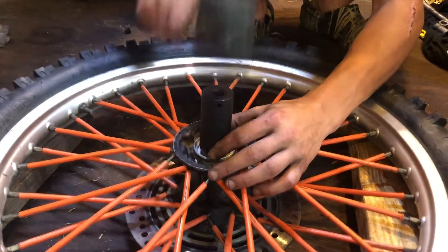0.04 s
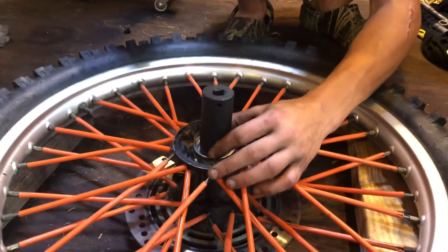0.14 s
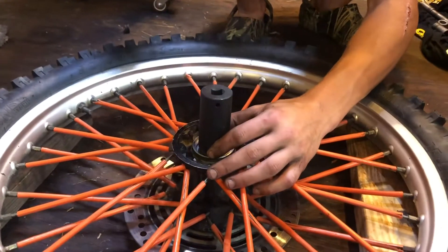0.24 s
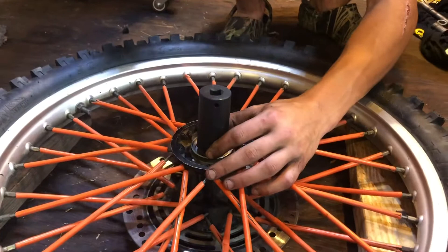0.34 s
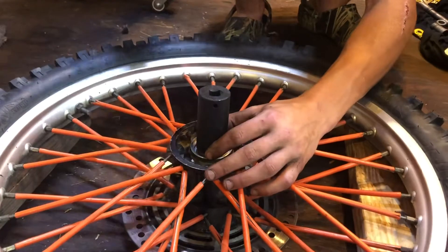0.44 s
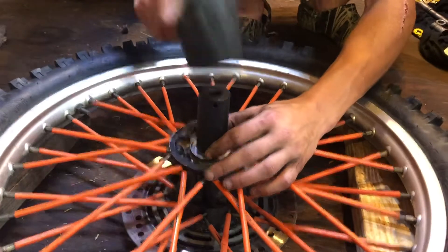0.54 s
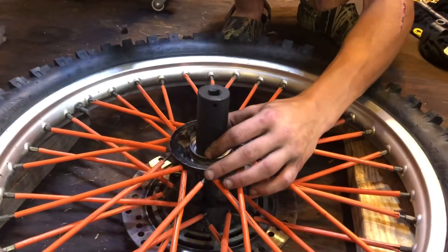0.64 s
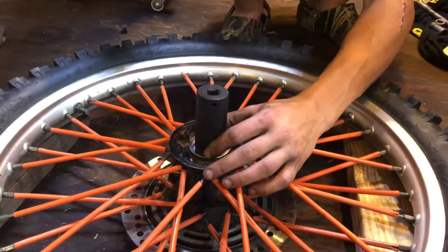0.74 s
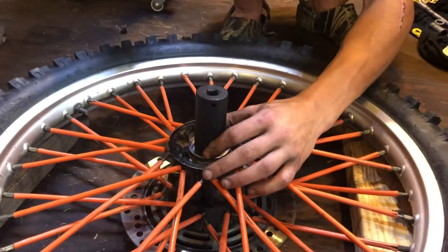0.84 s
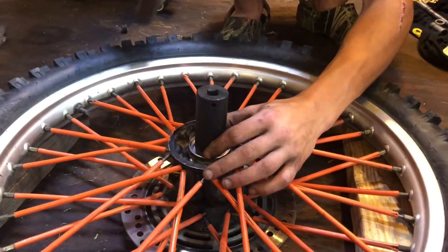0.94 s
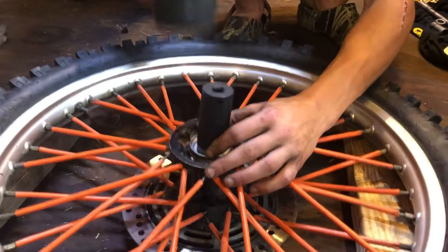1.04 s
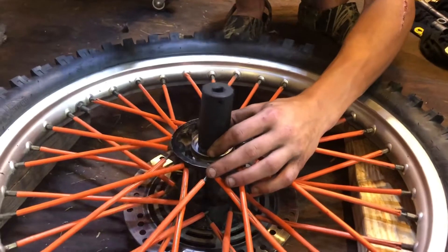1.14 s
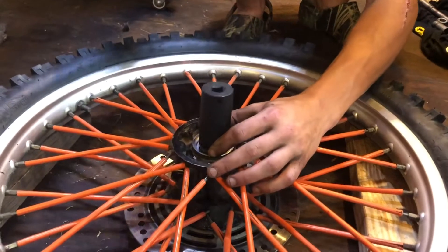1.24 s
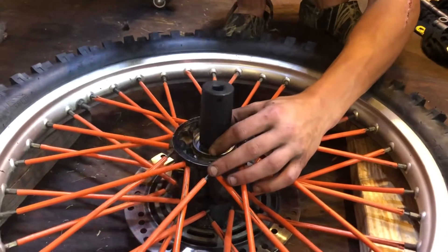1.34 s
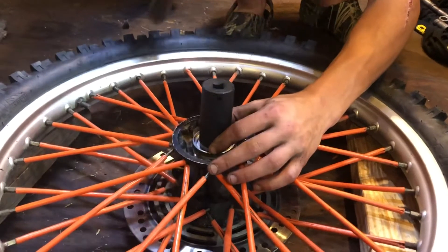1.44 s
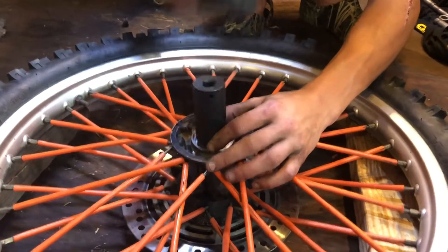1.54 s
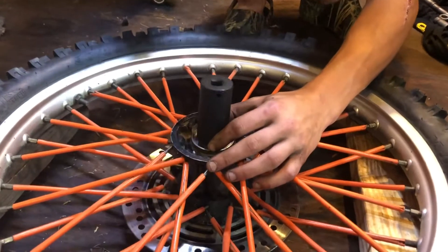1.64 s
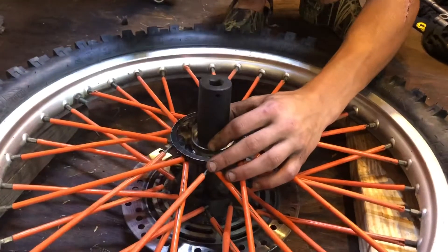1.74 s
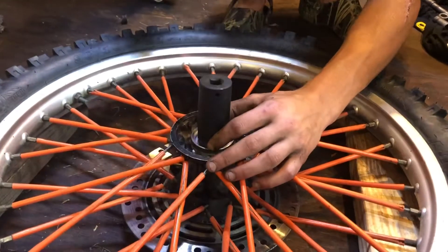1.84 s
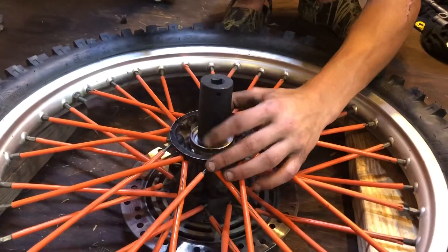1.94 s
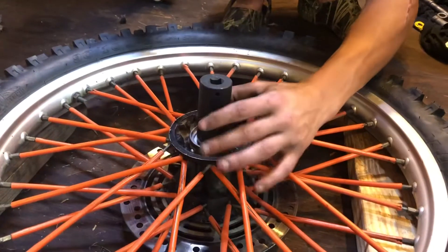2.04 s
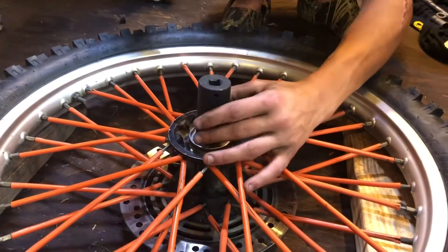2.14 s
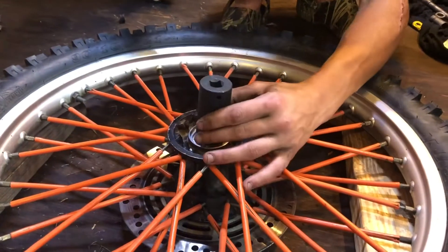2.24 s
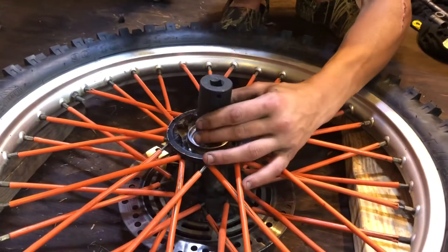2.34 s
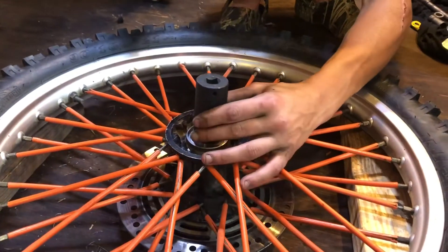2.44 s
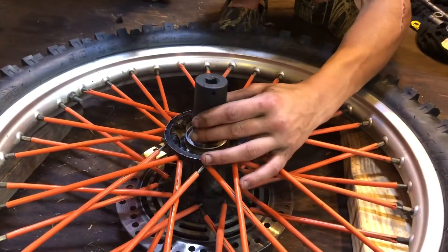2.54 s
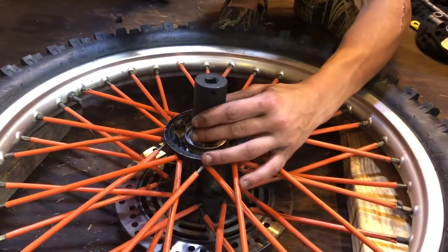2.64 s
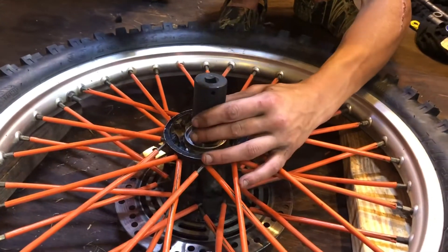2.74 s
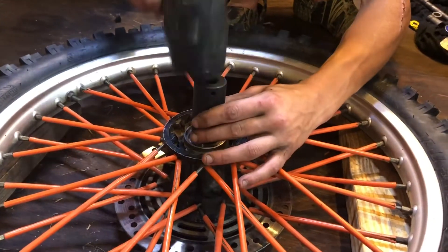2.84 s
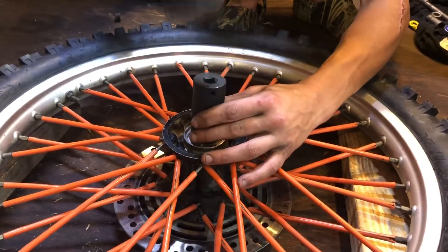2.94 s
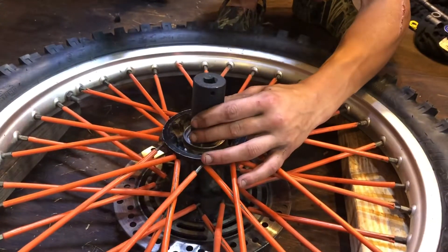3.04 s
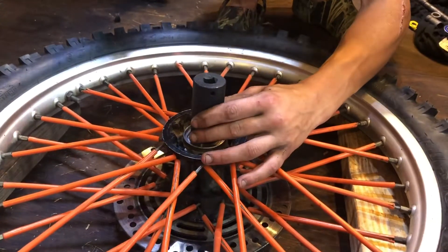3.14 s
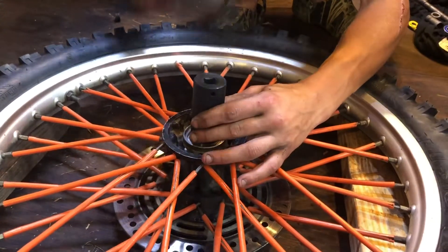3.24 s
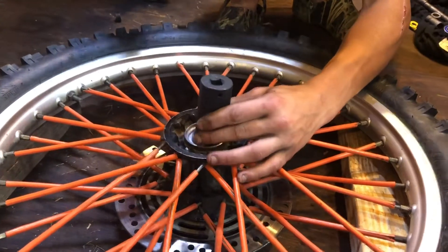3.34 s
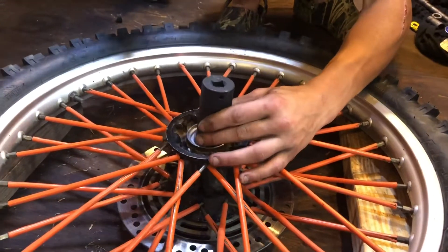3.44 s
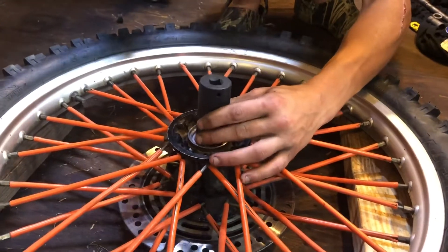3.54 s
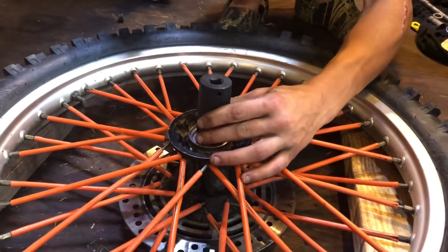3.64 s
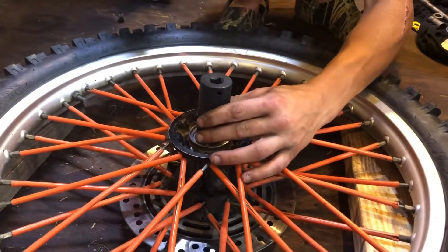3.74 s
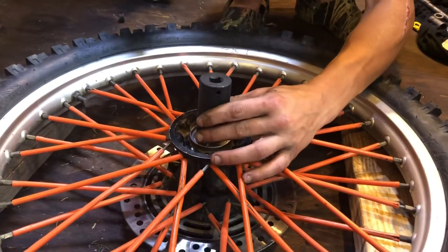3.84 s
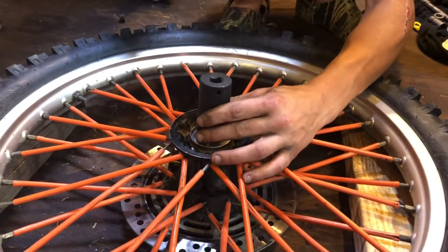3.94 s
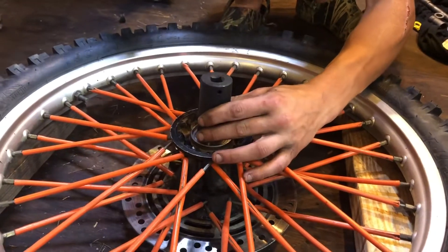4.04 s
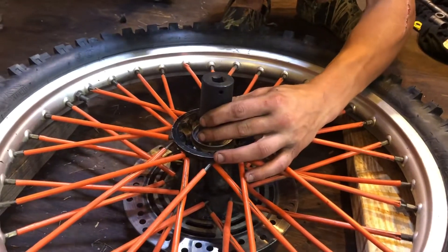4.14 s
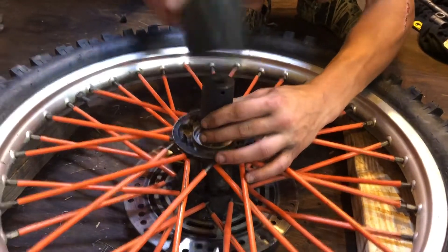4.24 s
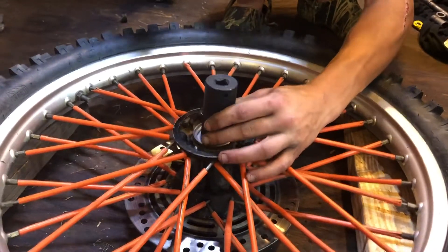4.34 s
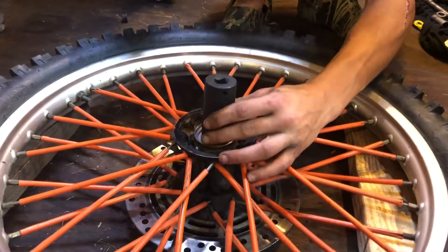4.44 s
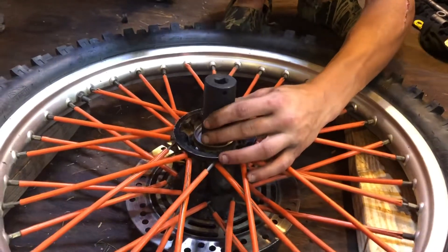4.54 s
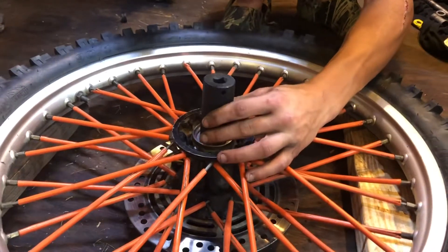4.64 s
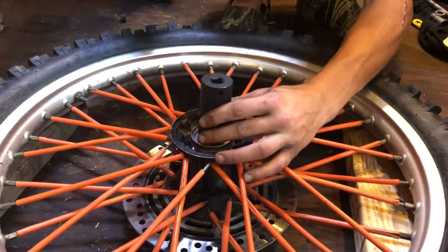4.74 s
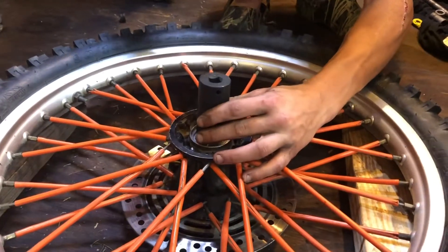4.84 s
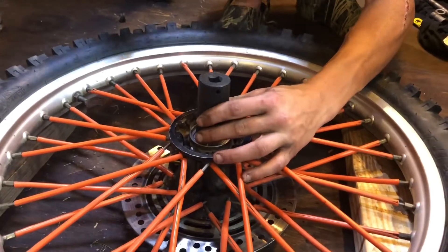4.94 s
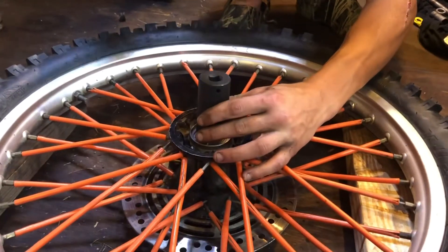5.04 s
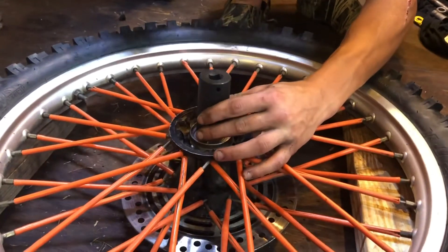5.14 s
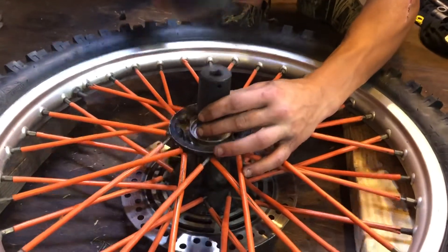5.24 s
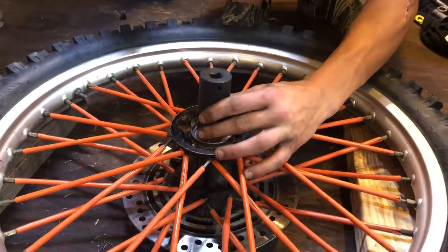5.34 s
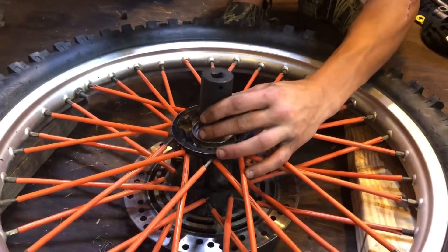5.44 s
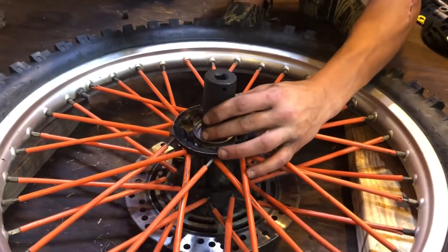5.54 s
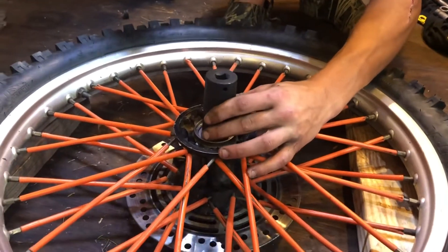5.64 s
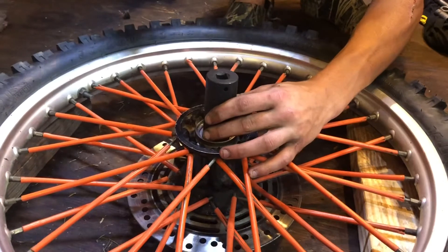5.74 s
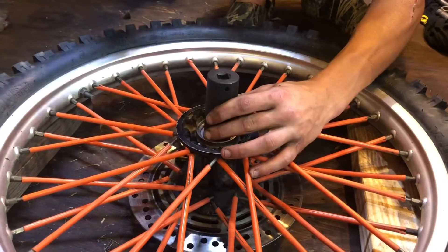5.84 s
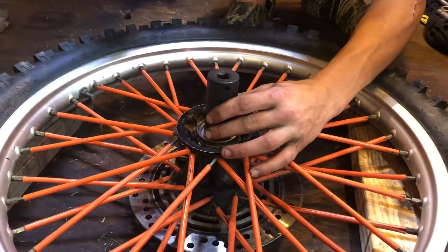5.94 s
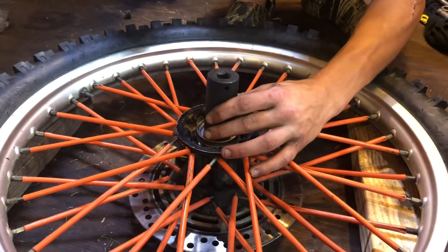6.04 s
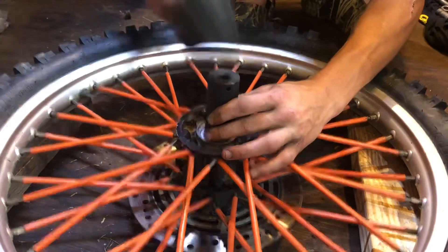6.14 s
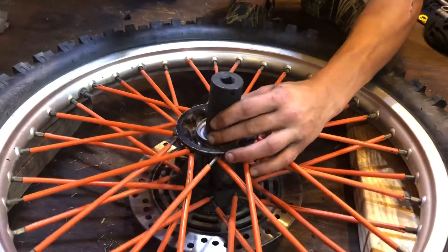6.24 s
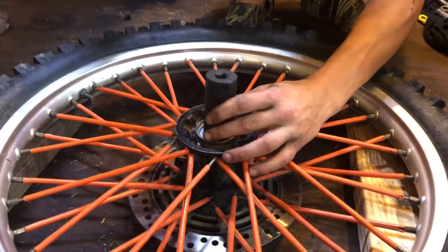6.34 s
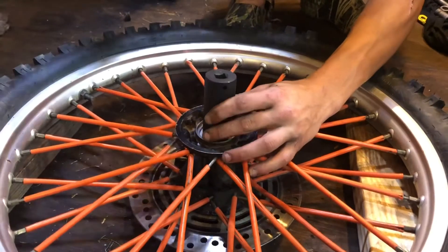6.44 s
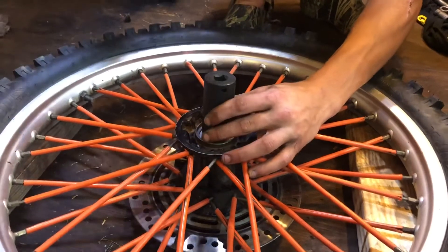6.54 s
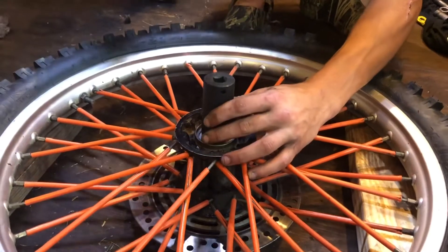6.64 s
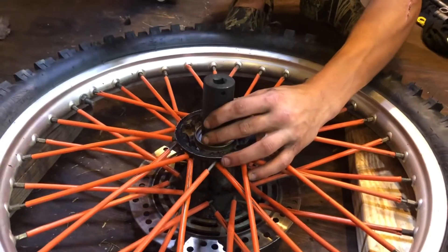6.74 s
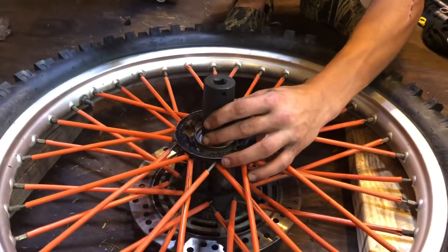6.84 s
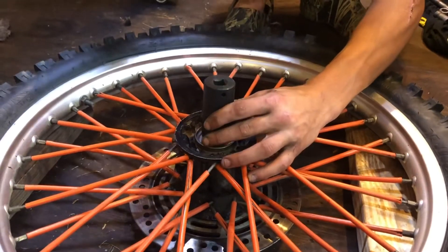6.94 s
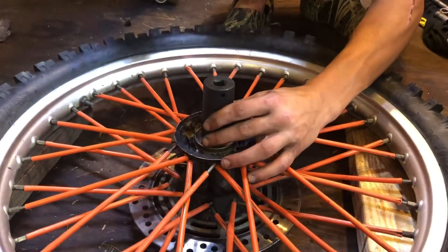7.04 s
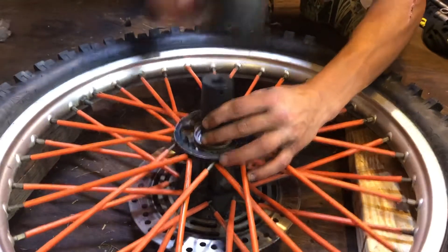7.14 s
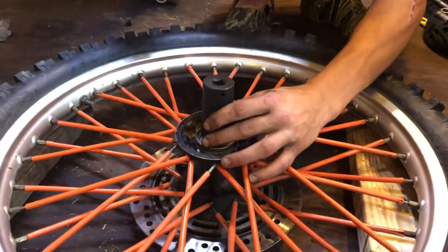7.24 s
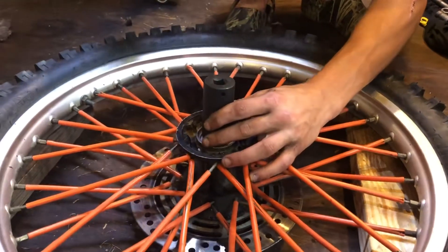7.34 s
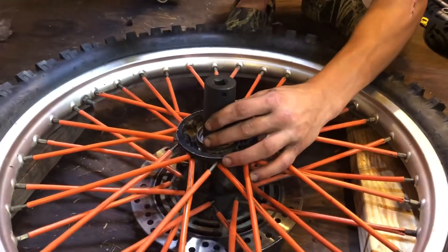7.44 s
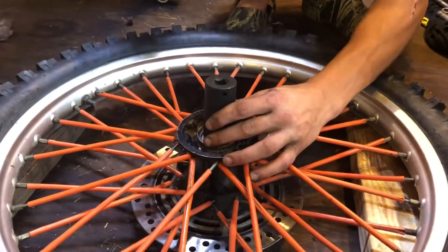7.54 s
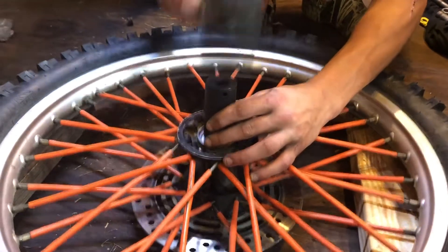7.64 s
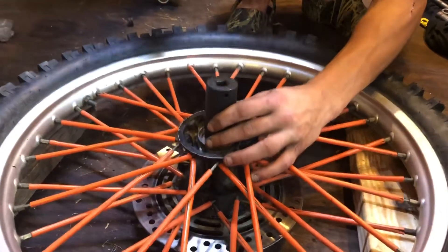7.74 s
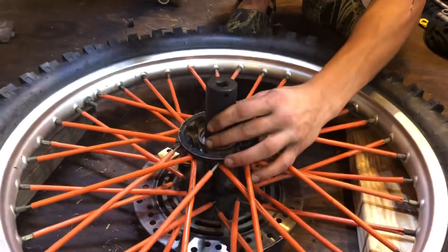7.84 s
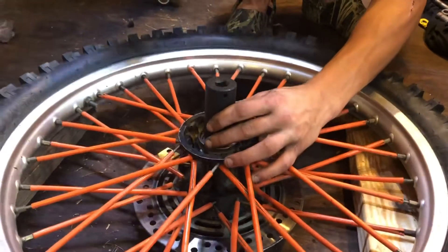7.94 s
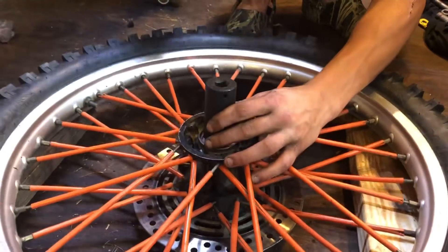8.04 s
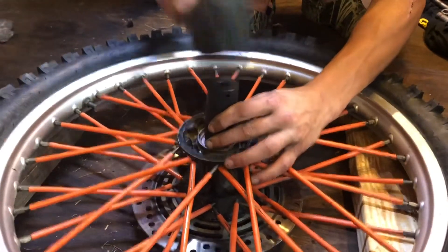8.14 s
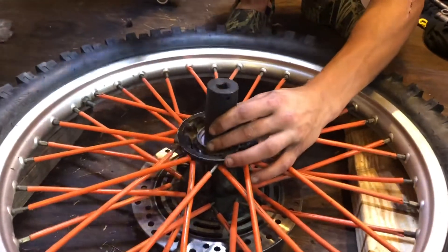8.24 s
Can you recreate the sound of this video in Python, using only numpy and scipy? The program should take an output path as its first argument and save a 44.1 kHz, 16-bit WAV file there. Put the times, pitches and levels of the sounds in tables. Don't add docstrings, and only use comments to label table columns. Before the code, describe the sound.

In a workshop, a rubber mallet hits a steel socket seated on a spoked wheel's hub. Four blows come about half a second apart, then a pause with faint finger nudges and metal ticks, then blows roughly a second apart, quickening at the end. Each is a loud, squashed crack with wooden thump, rapid loose metal clatter and a brief thin ring. The microphone is close; a distant fan hums low.

```python
import sys
import numpy as np
from scipy import signal
from scipy.io import wavfile
from scipy.ndimage import uniform_filter1d, minimum_filter1d

SR = 44100
rng = np.random.default_rng(int(sys.argv[2]) if len(sys.argv) > 2 else 0)


def transcribe(signal):
    frames = np.atleast_2d(signal).T
    limited = np.clip(frames, -1, 1)
    pcm = np.round(limited * 32767).astype(np.int16)
    wavfile.write(sys.argv[1], SR, pcm)


def ratio(d):
    e = np.asarray(d, float) / 20
    return 10 ** e


N = 365148

# (time [s], strength above the limiter [dB], hub ring [dB], floor thump [dB], rim note [dB])
BLOWS = [(0.0427, 18.5, -23, 6.5, 1.5), (0.5214, 16.5, 0.5, 1.5, 7), (0.9729, 14, -10, 7, 6.5),
         (1.4786, 15, -3, 5, 6), (3.2522, 17, 3.5, 2.5, -4), (4.2288, 16, -13.5, -1, -6),
         (5.1975, 14.5, 0, -6, -6), (6.1234, 17.5, -1.5, 0.5, 0.5), (7.106, 15, -8.5, -3, -1.5),
         (7.6398, 18.5, -2.5, 3.5, 1), (8.1282, 14.5, -4, 0, -0.5)]
BUZZ_DB = [-1.5, 3.5, -3.5, 2, 1, -10, -4.5, 3.5, -5, -4, -8.5]
BRIGHT_DB = [2.5, 3, 2.8, 2, 1.7, 3, 3.9, 1.8, 4, 2.6, 3]
DISC_DB = [-14, -15, -13, -14.5, -20, -13, -13, -21, -12, -17, -12]
STRIKE_CLICK_DB = [-13.5, -17.5, -12.5, -18, -10, -12, -16, -16.5, -13.5, -9.5, -17]
# (time [s], level [dB], start frequency [Hz], end frequency [Hz], length [s])
POPS = [(0.0474, 10.5, 1860, 549, 0.0055), (0.521, 0.5, 1700, 550, 0.0038),
        (0.9726, 6.5, 1430, 497, 0.0054), (1.478, 5.5, 1680, 550, 0.0069), (3.251, 3, 1790, 900, 0.004),
        (4.23, 2, 1816, 910, 0.005), (5.198, 2, 1105, 1914, 0.0035), (5.1998, 23, 2400, 3970, 0.0033),
        (6.1235, 11, 1300, 1840, 0.0021), (6.124, 14, 2970, 3440, 0.0039), (7.1066, 5, 1213, 1980, 0.0035),
        (7.1071, 14.5, 2700, 3500, 0.0045), (7.641, 6.5, 1540, 3300, 0.0027), (8.128, 1, 1563, 973, 0.0013)]
# (time [s], wall modes [dB], oval mode [dB], lip mode [dB], bore mode [dB])
SOCKET_RINGS = [(0.042, -40.5, -66, -85, -72), (0.52, -46, -67, -85, -74), (0.973, -44, -63, -67, -79),
                (1.475, -42, -95.5, -77, -77.5), (3.25, -43.5, -84, -75, -80),
                (4.228, -46.5, -60.5, -70.5, -69.5), (5.197, -45, -63.5, -71, -72.5),
                (6.123, -57, -79, -76, -78), (7.105, -48, -55.5, -67.5, -73.5),
                (7.64, -51.5, -61, -67, -84.5), (8.129, -41.5, -64, -73, -82)]

# (frequency [Hz], t60 [s])
SOCKET = [(2891, .42), (5755, 0.24), (6855, 0.27), (10770, .28), (12260, .22)]
FAMILY = (0, 1, 0, 2, 3)
PARTNER_DB = (-3, -5, -27, -2, -2)
# (frequency [Hz], level [dB], t60 [s])
SLAP = [(1000, -1, 0.021), (597, 5, 0.0067), (1800, -6, 0.046)]
# (frequency [Hz], density [dB per Hz])
BODY = [(200, 3), (400, -11.5), (530, -23.5), (700, -15.5), (1500, -11), (2450, -18.5), (3600, -22),
        (4600, -32.5), (5900, -27.5), (10000, -29.5), (15500, -32.5)]
# (frequency [Hz], t60 [s])
BODY_T60 = [(150, 0.32), (600, 0.24), (2000, 0.28), (5000, 0.22), (10000, 0.19), (15500, 0.16)]
# (frequency [Hz], level [dB], t60 [s])
HUB = [(668, -7, 0.072), (828, -9, 0.28), (880, -6, 0.3), (896, -20.5, 0.13), (1064, -1.5, 0.26),
       (1325, 1, 0.15), (1360, 2, 0.04), (1400, -18, 0.11), (2060, -5.5, 0.041), (2135, -13, 0.037)]
# (frequency [Hz], level [dB], t60 [s])
DISC = [(1572, -29, .5), (4549, -16, .22), (8070, -30, .14), (9340, -27, .12)]
# (frequency [Hz], level [dB], t60 [s])
RIM = [(335, -2.5, 0.23), (333.2, -11, 0.33), (411.8, -5.5, 0.11)]
# (frequency [Hz], level [dB], t60 [s])
THUMP = [(47.2, -0.5, 0.38), (66.8, 6, 0.13), (106.1, -5, 0.31), (160.2, 0, 0.18), (226, -10.5, 0.3),
         (266.8, 9, 0.14)]
# (frequency [Hz], level [dB], t60 [s])
CLICK = [(4550, 1, .012), (3800, 0, .007), (5150, -2, .007), (3100, -1, .009), (2260, -7, .014),
         (1400, -10, .008), (8500, -19, .004), (13000, -18, .003)]
# (frequency [Hz], level [dB], t60 [s])
KNOCK = [(2225, 2.5, 0.02), (1300, 2, 0.022), (900, -0.5, 0.022), (1838, -3.5, 0.02), (686.5, -3, 0.035)]
# (frequency [Hz], level [dB], t60 [s])
TICK = [(10200, 12, 0.084), (10200, -9.5, 0.025)]
# (frequency [Hz], level [dB], t60 [s])
SNAP = [(3300, 0, .007), (4100, -1, .007), (4800, -3, .006), (2600, -3, .008), (7500, -20, .006)]

# (time [s], click [dB], knock [dB])
CLACKS_HARD = [(0.0925, 1, 4), (.1101, -1, -7), (0.1193, -3, -5), (.1232, -2.5, -2), (0.5477, -2, -6.5),
               (0.585, -13, -9), (.5913, 1, -3), (.5975, -7, -10.5), (.99, -2.5, -3), (1.0467, -13.5, -2),
               (1.097, -17.5, -16), (1.5344, -8, -10), (1.546, -8, -9.5), (1.5566, -20, -22),
               (3.2893, -3.5, -6), (3.3095, -12, -6.5), (4.2405, -7.5, -14.5), (4.2457, -5, -8),
               (4.2672, -5, -12.5), (5.2057, -3, -7), (5.2597, -12.5, -9), (5.2739, -24, -16),
               (5.2772, -20, -16), (6.151, -6.5, -10), (6.1994, -12.5, -12.5), (7.1346, -7, -10.5),
               (7.1551, -4, -10), (7.1733, -1, -2), (7.1767, -7, -1.5), (7.6565, -8, -7),
               (7.681, -14, -5.5), (7.7211, -9.5, -12.5), (8.1425, -11, -12), (8.1804, -4.5, -4)]
# (time [s], click [dB], knock [dB])
CLACKS_DULL = [(0.068, -22, -4.5), (.1518, -21, -12), (.5356, -9.5, -9.5), (.5687, -13.5, -9),
               (.6145, -22, -10.5), (1.0516, -8, -12), (1.0705, -21, -11.5), (1.0872, -24, -11),
               (1.1358, -31, -18), (1.1453, -26.5, -16), (1.4952, -15, -6.5), (1.5226, -18.5, -10.5),
               (1.6019, -12.5, -3), (1.6107, -21, -16), (1.6575, -30, -14.5), (3.2663, -23, -7.5),
               (3.2785, -8.5, -4.5), (3.3254, -23.5, -17), (3.3517, -44, -21.5), (4.2805, -14, -5),
               (4.2944, -22, -14), (4.3062, -23, -8), (5.2451, -15, -9), (6.1721, -11, -8),
               (6.1911, -11.5, -8), (6.2127, -24, -10), (7.1473, -14.5, -15), (7.1617, -9.5, -5.5),
               (7.6703, -31, -17.5), (7.6954, -13, -5), (8.1689, -7, -6)]
# (time [s], level [dB])
CONTACTS = [(0.049, -0.5), (0.0554, -23), (0.0819, -31), (0.1344, -23), (0.1586, -5), (0.166, -13),
            (0.1834, -27), (0.198, -38), (0.5268, 0), (0.6017, -7.5), (0.639, -24), (0.6473, -13),
            (0.6547, -29), (0.9812, -0.5), (0.985, -11), (1.0181, -12), (1.1038, -10.5), (1.1102, -29),
            (1.14, -16), (1.4869, -5), (1.4985, -5), (1.5541, -1.5), (1.564, -26), (1.6172, -30),
            (3.2577, -2), (3.2725, -16.5), (3.3197, -15), (4.2344, -9), (4.253, -8.5), (4.258, -8),
            (4.2985, -10.5), (5.2012, 4.5), (5.2064, 3), (5.2121, -9), (5.2297, -18), (6.1316, -4.5),
            (6.1393, -7), (6.185, -26), (6.2026, -26), (6.2055, -15), (6.2235, -32), (7.1093, 0.5),
            (7.1173, -5), (7.1222, -6), (7.1814, 1.5), (7.184, 5), (7.1934, -9), (7.6472, -8), (7.711, -10),
            (7.7174, 1), (7.7241, -6), (7.7592, -38), (7.762, -33), (8.1309, -17), (8.1334, -3),
            (8.1472, 3), (8.1546, -10), (8.187, -16), (8.1969, -16), (8.2173, -23)]
# (time [s], level [dB], time in the air [s])
HOPS = [(0.0932, -20, 0.014), (0.1103, -20, 0.012), (0.5478, -19.5, 0.028), (0.59, -25, .011),
        (1.007, -28, 0.018), (1.0474, -30, .014), (1.0805, -42, .02), (1.1418, -42.5, 0.015),
        (1.499, -22, .036), (1.546, -26.5, 0.012), (1.657, -44, 0.038), (3.258, -24, .03),
        (3.2906, -18, .02), (3.312, -27, .025), (4.2418, -17, 0.0074), (4.2658, -17.5, 0.02),
        (4.293, -26, 0.013), (5.206, -16.5, .06), (5.2734, -39, .012), (6.1302, -23.5, 0.014),
        (6.1745, -25, 0.029), (6.206, -27, 0.0075), (7.113, -34.5, .02), (7.173, -23, 0.013),
        (7.649, -29, .02), (7.6954, -42, .02), (7.715, -29, .012), (8.1533, -27, .015),
        (8.1795, -21.5, .015)]
# (time [s], level [dB], t60 [s])
DISC_PINGS = [
    (1.0184, -8, .02),
    (5.2835, -27, .05),
    (7.7207, -9.5, 0.069),
    (7.758, -31, 0.11),
]

# (time [s], level [dB], pitch [Hz], t60 [s], click [dB])
NUDGES = [(1.88, -18, 970, 0.016, -39.5), (2.116, -29, 1010, 0.051, -52), (2.131, -26, 888, 0.057, -59),
          (2.208, -38, 887, 0.18, -65), (2.238, -37, 950, 0.086, -67), (2.269, -40, 960, 0.12, -72),
          (2.394, -28, 1040, 0.029, -53), (2.843, -30, 795, 0.013, -42), (2.848, -24, 1580, 0.024, -19.5),
          (3.753, -29, 1030, 0.034, -72), (5.478, -36.5, 1430, 0.037, -67), (6.3212, -23, 1400, .03, -46),
          (6.338, -24.5, 990, 0.035, -59), (6.44, -37.5, 917, 0.14, -60), (6.4986, -28, 973, 0.055, -32),
          (6.531, -33, 1120, 0.04, -45)]
# (time [s], level [dB])
RIM_BUMPS = [
    (1.881, -39),
    (2.848, -23.5),
    (6.5001, -45),
]
# (time [s], snap [dB], sing [dB])
TICKS = [(1.882, -64, -64), (2.0605, -59, -80), (2.187, -53, -64), (2.2, -66, -62), (2.212, -56, -65),
         (2.265, -76, -69), (2.4, -61, -69), (2.843, -58, -77), (2.847, -46, -59), (2.853, -57, -75),
         (3.471, -97, -63), (3.539, -53, -78), (3.756, -75, -69), (3.7695, -58, -70), (3.795, -65, -74.5),
         (6.399, -54, -57), (6.4353, -51, -57), (6.452, -59, -73), (6.499, -60, -70)]
# (time [s], click [dB], knock [dB])
LATE_KNOCKS = [
    (1.8795, -48, -33),
    (2.8475, -30, -31),
    (6.4986, -45, -36),
]

# (frequency [Hz], density [dB per Hz])
AIR = [(24, -28.5), (40, -6.5), (75, -2), (318, -15.5), (440, -15), (566, -18), (625, -16), (691, -17.5),
       (844, -18), (1230, -23), (2660, -34), (7500, -48), (10300, -55.5), (13500, -53), (15700, -54)]
# (frequency [Hz], level [dB], width [Hz])
FAN = [(56.2, 1.5, 6.), (88.2, -6.5, 2.7), (123, -7.5, 4.), (167, -8.5, 5.6), (424, -23.5, 18),
       (624, -14, 2), (690, -33, 3.6), (838, -22.5, 1.3)]
# (time [s], low level [dB], relative hiss [dB])
SHOP = [(0.0, -35, 1.5), (1.3, -37.5, 0), (2.0, -37.5, 4), (3.2, -37, 2.5), (4.1, -37, 1), (4.802, -40, 1),
        (5.799, -41.5, 2), (6.9, -39, 1.5), (8.28, -39.5, 1)]
# (time [s], level [dB])
OUTPUT = [(0, -1), (4.502, -1), (5.202, -0.5), (6.1, -4), (7.1, -2.5), (8.28, -2)]

FADE_DB_PER_S = 280
RIM_RISE_S, THUMP_RISE_S = .007, .011
WASH_RISE_S, RING_RISE_S = 0.00067, .07
CONTACT_DB, CONTACT_KNOCK_DB, STRIKE_KNOCK_DB = -9.5, -9, -14
EARLY_S, EARLY_DB = .012, 2.5
BUZZ_HZ, BUZZ_WIDTH_HZ, BUZZ_T60 = 10280, 51, 0.22
SWELL_DB, SWELL_S = 15, 0.11
GHOST_DB, GHOST_LEAD = -34.5, 1024
TOP_OPEN_DB, TOP_OPEN_S = -8, .006


def mallet():
    mix = np.zeros(N)
    for (s, *levels), *colour in zip(BLOWS, BUZZ_DB, BRIGHT_DB, DISC_DB):
        add(mix, s, blow(*levels, *colour))
    for s, *family_db in SOCKET_RINGS:
        add(mix, s, socket_ring(family_db))
    for s, *sweep in POPS:
        add(mix, s, pop(*sweep))
    return mix


def blow(strength_db, hub_db, thump_db, rim_db, buzz_db, bright_db, disc_db):
    t = np.arange(round(.9 * SR)) / SR
    slap = ring(SLAP, .9, scatter_db=1.5, detune=.04)
    crack = ratio(-9.0 - 60 * t / 0.002) * rng.standard_normal(len(t)) + ratio(-14.0) * slap
    body = ratio(3.0) * wash(.9, bright_db) * (1 - np.exp(-t / WASH_RISE_S))
    hub = ratio(-22.5 + hub_db) * ring(HUB, .9, scatter_db=2.5, rise=0.0049)
    disc = ratio(disc_db) * ring(DISC, .9, scatter_db=-4.5, detune=0.00058, rise=0.017)
    rough = ratio(-33 + buzz_db - 60 * t / BUZZ_T60) * buzz(.9, BUZZ_WIDTH_HZ)
    rough = rough * (1 - np.exp(-t / 0.0079))
    rim = ratio(-13.5 + rim_db) * ring(RIM, .9, scatter_db=-4.0, detune=0.0049, rise=RIM_RISE_S)
    thump = ratio(-22.0 + thump_db) * ring(THUMP, .9, scatter_db=1.5, detune=.04, rise=THUMP_RISE_S)
    return ratio(strength_db) * (crack + body + hub + disc + rough + rim + thump)


def socket_ring(family_db):
    modes = []
    for (hz, t60), family, partner_db in zip(SOCKET, FAMILY, PARTNER_DB):
        start_db = family_db[family] + partner_db + 60 * 0.21 / t60
        modes.append((hz, start_db, t60))
    return ring(modes, 0.79, scatter_db=0.0, detune=.0004, rise=RING_RISE_S)


def pop(db, from_hz, to_hz, seconds):
    t = np.arange(round(seconds * SR)) / SR
    sweep = signal.chirp(t, from_hz, t[-1], to_hz, phi=-90)
    return ratio(db) * sweep * signal.windows.tukey(len(t), .5)


def wash(seconds, bright_db, grain_db=2.2):
    count = round(seconds * SR)
    lumps = evened(uniform_filter1d(uniform_filter1d(rng.standard_normal(count), 90), 90))
    hz, t, z = signal.stft(rng.standard_normal(count) * ratio(grain_db * lumps), SR, nperseg=128)
    colour_db = read(BODY, hz) + bright_db * np.clip(np.log2(hz / 1500 + 1e-9), 0, 3)
    z = z * (1 - np.exp(-(np.outer(hz + 100, t) / 2.6) ** 2))
    z = z * ratio(colour_db[:, None] - 60 * t / read(BODY_T60, hz)[:, None])
    return signal.istft(z, SR, nperseg=128)[1][:count]


def ring(modes, seconds, scatter_db=6.5, detune=0.0049, rise=0.00041, unlocked=1):
    hz, db, t60 = np.transpose(modes)[:, :, None]
    pitch_luck, level_luck, phase_luck = rng.standard_normal((3, len(modes), 1))
    t = np.arange(round(seconds * SR)) / SR
    phase = 2 * np.pi * hz * (1 + detune * pitch_luck) * t + unlocked * phase_luck
    level = ratio(db + scatter_db * level_luck - 60 * t / t60)
    return (level * np.sin(phase)).sum(0) * (1 - np.exp(-(t / rise) ** 2))


def buzz(seconds, width):
    t = np.arange(round(seconds * SR)) / SR
    pole = np.exp(-np.pi * width / SR)
    a, b = rng.standard_normal((2, len(t)))
    slow = signal.lfilter([1], np.poly([pole, pole]), a + 1j * b)
    return evened((slow * np.exp(2j * np.pi * BUZZ_HZ * t)).real)


def rebounds():
    sounds = [(s, clack(click_db, knock_db)) for s, click_db, knock_db in CLACKS_HARD + CLACKS_DULL]
    for s, db in CONTACTS:
        early = any(0 < s - blow_s < EARLY_S for blow_s, *_ in BLOWS)
        sounds.append((s, clack(db + CONTACT_DB + EARLY_DB * early, db + CONTACT_KNOCK_DB)))
    sounds += [(s, sing(db, air_s)) for s, db, air_s in HOPS]
    for (s, *_), click_db in zip(BLOWS, STRIKE_CLICK_DB):
        sounds.append((s + 0.000832, clack(click_db, STRIKE_KNOCK_DB)))
    mix = np.zeros(N)
    for s, sound in sounds:
        add(mix, s, ratio(left_db(s) + 2.0) * echoed(sound, echo_db=-14.0))
    return mix


def left_db(s):
    start, strength_db = np.transpose(BLOWS)[:2]
    last = np.searchsorted(start, s) - 1
    return max(strength_db[last] - FADE_DB_PER_S * (s - start[last]), 0)


def clack(click_db, knock_db):
    click = ring(CLICK, .08, scatter_db=1.5, detune=.035, rise=.0003, unlocked=.4)
    knock = ring(KNOCK, .08, scatter_db=1.5, detune=0.015, rise=0.0016)
    return ratio(min(click_db, 1) + 3) * click + ratio(min(knock_db, -3) + 1.5) * knock


def sing(db, air_s):
    damped_db = -1500 * np.maximum(np.arange(round(.08 * SR)) / SR - air_s, 0)
    return ratio(db - 9.0 + damped_db) * ring(TICK, .08, scatter_db=0.0, detune=0.00075)


def echoed(x, echo_db=-11):
    t = np.arange(round(.2 * SR)) / SR
    dull = signal.lfilter([1], np.poly([.55, .4]), rng.standard_normal(len(t)))
    tail = dull * ratio(-60 * t / 0.19) * (t > .005)
    wet = ratio(echo_db) * signal.fftconvolve(x, tail / np.linalg.norm(tail))
    return wet + np.pad(x, (0, len(t) - 1))


def disc_pings():
    mix = np.zeros(N)
    for s, db, t60 in DISC_PINGS:
        add(mix, s, ratio(left_db(s)) * ring([(4549, db, t60)], .1, scatter_db=0, detune=0))
    return mix


def hand():
    mix = np.zeros(N)
    for s, *nudge_settings in NUDGES:
        add(mix, s, echoed(nudge(*nudge_settings), echo_db=-11.5))
    rocking = [(328.0, 0, 0.44), (108.6, -3, 0.18), (86.7, 2.5, 0.2)]  # (frequency [Hz], level [dB], t60 [s])
    for s, db in RIM_BUMPS:
        add(mix, s, ratio(db) * ring(rocking, .5, scatter_db=0, detune=0, rise=0.0015))
    t = np.arange(round(.06 * SR)) / SR
    for s, snap_db, sing_db in TICKS:
        add(mix, s, ratio(snap_db + 9.5) * scuff())
        add(mix, s, ratio(sing_db + 6) * buzz(.06, width=57) * ratio(-60 * t / 0.097))
    for s, click_db, knock_db in LATE_KNOCKS:
        add(mix, s, echoed(clack(click_db, knock_db), echo_db=-15))
    return mix


def nudge(db, hz, t60, click_db):
    note = ring([(hz, db, t60)], .1, scatter_db=0, detune=0, rise=0.0005)
    knock = ring(KNOCK, .1, scatter_db=1, rise=.001) + ratio(-18) * ring(HUB[5:], .1, scatter_db=1)
    click = ring(SNAP, .1, scatter_db=1, detune=0, rise=0.0004)
    return note + ratio((db + click_db) / 2 + 3) * knock + ratio(click_db + 1) * click


def scuff():
    t = np.arange(round(.03 * SR)) / SR
    treble = signal.butter(N=2, Wn=7500, btype="high", fs=SR, output="sos")
    hiss = signal.sosfilt(treble, rng.standard_normal(len(t)))
    return hiss * ratio(-60 * t / 0.022) * (1 - np.exp(-t / 0.00055))


def rustle():
    mix = np.zeros(N)
    band = signal.butter(N=3, Wn=(3900, 6300), btype="band", fs=SR, output="sos")
    hiss = signal.sosfilt(band, rng.standard_normal(SR // 4))[:round(.16 * SR)]
    add(mix, 4.88, ratio(-58) * evened(hiss) * np.hanning(len(hiss)))
    return mix


def background():
    t = np.arange(N) / SR
    s, low_db, hiss_db = np.transpose(SHOP)
    air = shop_air(s, hiss_db)
    for hz, db, width in FAN:
        waver = evened(uniform_filter1d(uniform_filter1d(rng.standard_normal(N), 3000), 3000))
        phase = 2 * np.pi * np.cumsum(hz + .5 * width * waver[::-1]) / SR
        air = air + ratio(db + 0.68 * waver) * np.sin(phase)
    since = t - np.transpose(BLOWS)[0][:, None]
    swell = (np.exp(-np.maximum(since, 0) / SWELL_S) * (since > 0)).max(axis=0)
    return air * ratio(np.interp(t, s, low_db) + SWELL_DB * swell)


def shop_air(s, hiss_db):
    frames, hz = N // 512 + 5, np.fft.rfftfreq(2048, 1 / SR)
    a, b, patches = rng.standard_normal((frames, 1025, 3)).T
    patches = evened(uniform_filter1d(uniform_filter1d(patches, 20, 0), 8, 1))
    octaves = np.clip(np.log2(hz / 300 + 1e-9), 0, 4)
    tilt_db = np.outer(octaves / 4, np.interp(np.arange(frames) * 512 / SR, s, hiss_db))
    z = (a + 1j * b) * ratio(read(AIR, hz)[:, None] + 1.5 * patches + tilt_db)
    return ratio(-3.5) * evened(signal.istft(z, nperseg=2048, noverlap=1536)[1][:N])


def read(points, hz):
    f, value = np.transpose(points)
    return np.interp(np.log(hz + 1), np.log(f + 1), value)


def evened(x):
    return x / np.sqrt(np.mean(x ** 2) + 1e-20)


def add(mix, s, sound):
    part = mix[round(s * SR):][:len(sound)]
    part += sound[:len(part)]


def scene():
    return (mallet() + rebounds() + disc_pings() + hand() + rustle() + background())[None]


def low_pass(x):
    return signal.sosfilt(signal.butter(12, 17150, fs=SR, output="sos"), x)


def record(dry):
    x = signal.sosfilt(signal.butter(N=3, Wn=41, btype="high", fs=SR, output="sos"), dry[0])
    peak_db = 20 * np.log10(abs(x) + 1e-9) + .6
    fall = np.arange(N) * 400. / SR
    over_db = np.maximum(np.maximum.accumulate(peak_db + fall) - fall, 0)
    x = x * ratio(uniform_filter1d(minimum_filter1d(-over_db, size=21), size=21))
    x = x * ratio(np.interp(np.arange(N) / SR, *np.transpose(OUTPUT)))
    ghost = signal.sosfilt(signal.butter(N=1, Wn=(1200, 9000), btype="band", fs=SR, output="sos"), x)
    x = x + ratio(GHOST_DB) * np.pad(ghost[GHOST_LEAD:], (0, GHOST_LEAD))
    narrow = signal.firwin(numtaps=511, cutoff=15900, window=("kaiser", 8), fs=SR)
    wide = signal.firwin(numtaps=255, cutoff=16800, window=("kaiser", 8), fs=SR)
    low = signal.oaconvolve(x, narrow, "same")
    full = signal.oaconvolve(x, wide, "same")
    top = np.zeros(N)
    for s, *_ in BLOWS:
        add(top, s - TOP_OPEN_S / 2, ratio(TOP_OPEN_DB) * np.hanning(round(TOP_OPEN_S * SR)))
    return low_pass((low + top * (full - low))[None])


dry = scene()
out = record(dry)
transcribe(out)
```